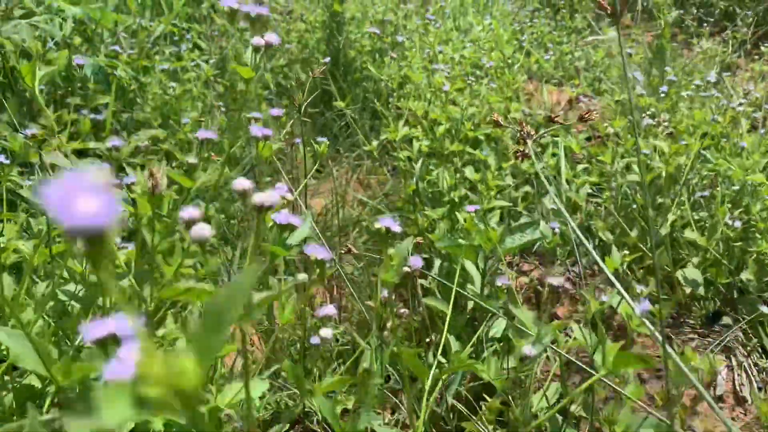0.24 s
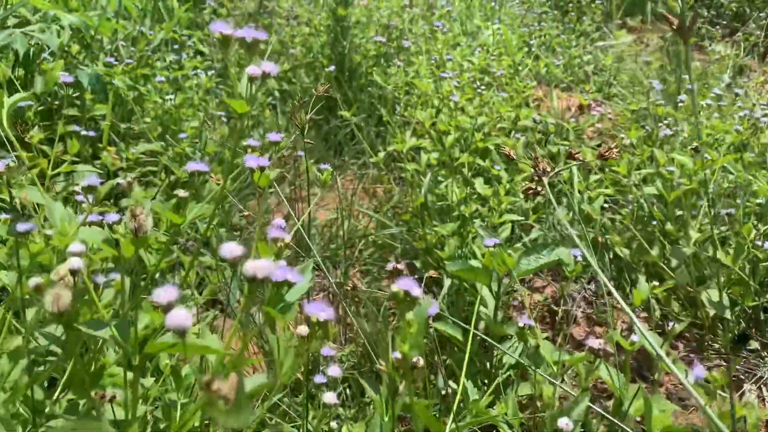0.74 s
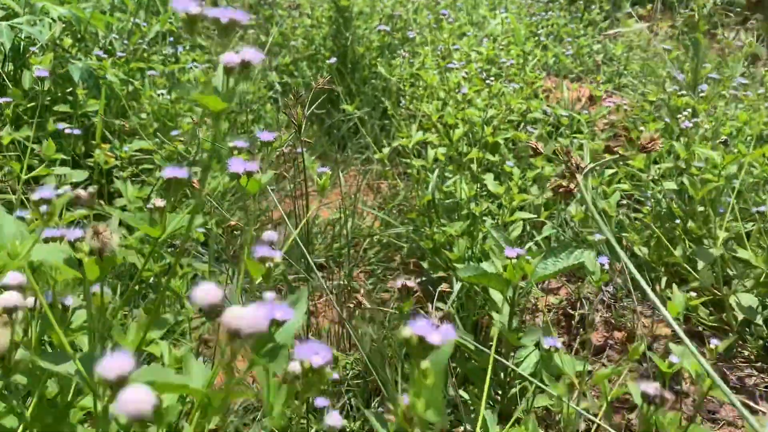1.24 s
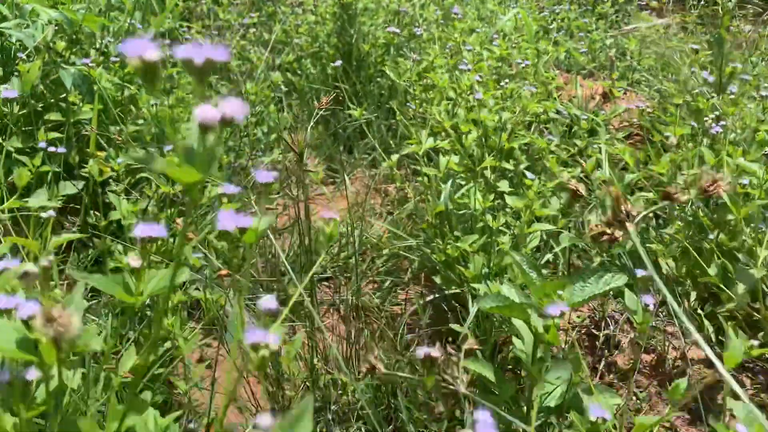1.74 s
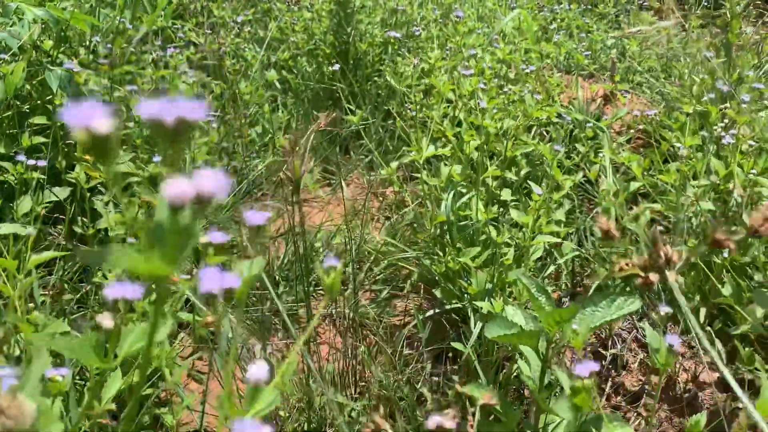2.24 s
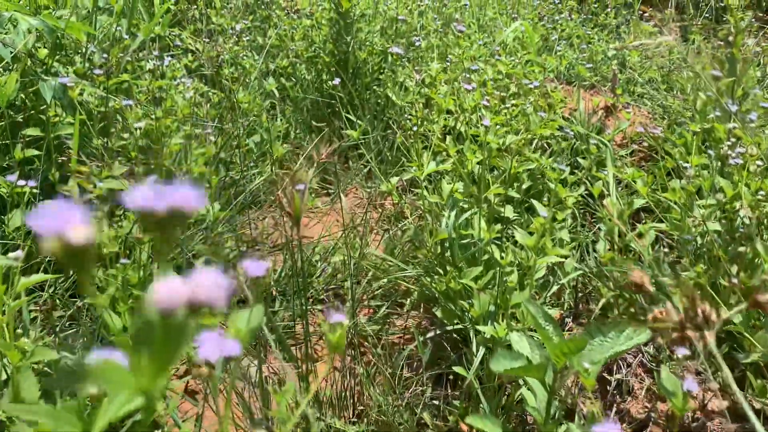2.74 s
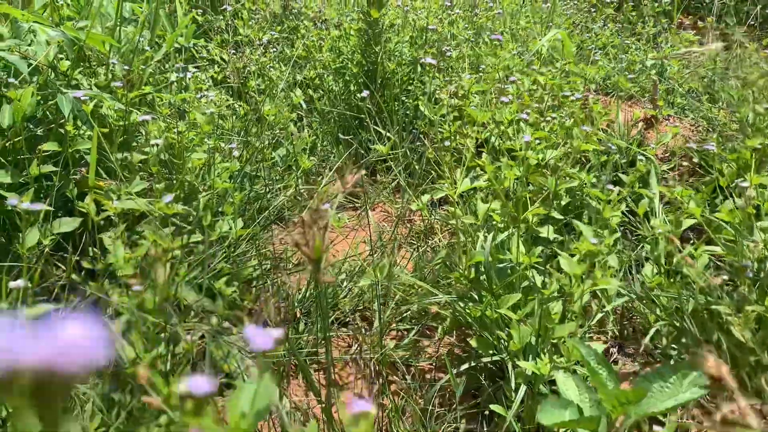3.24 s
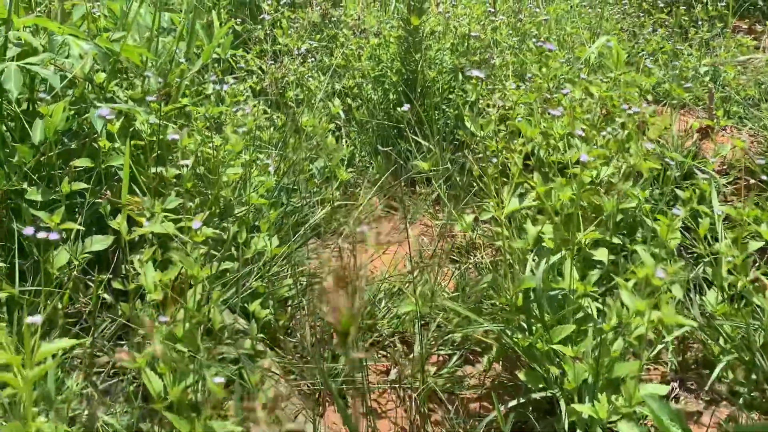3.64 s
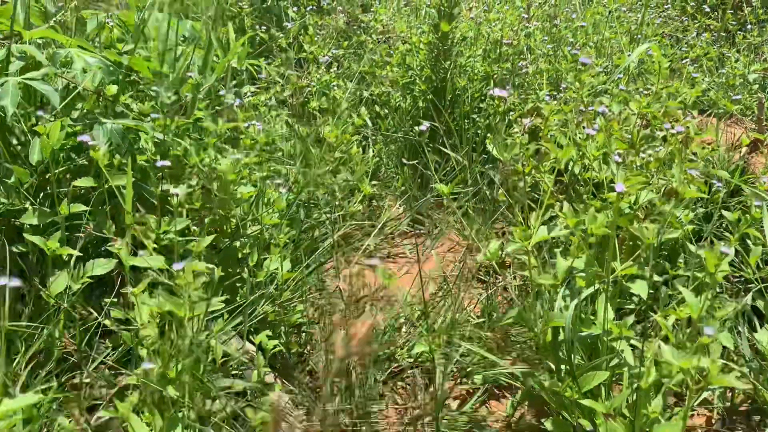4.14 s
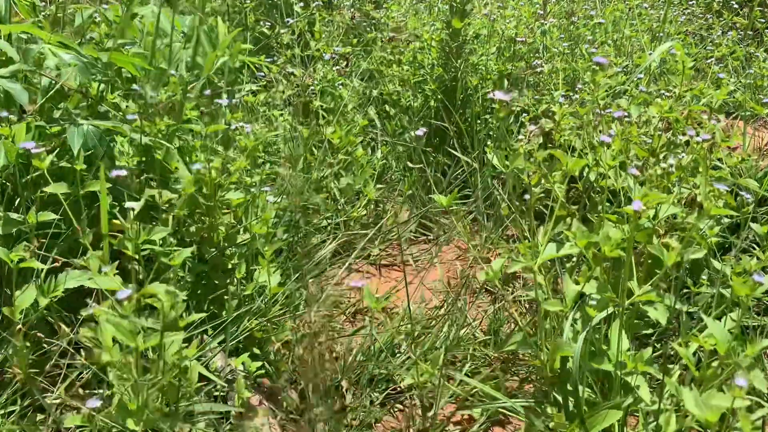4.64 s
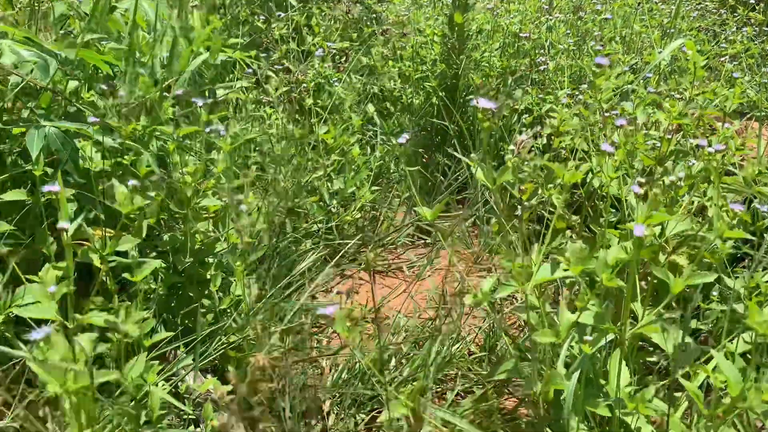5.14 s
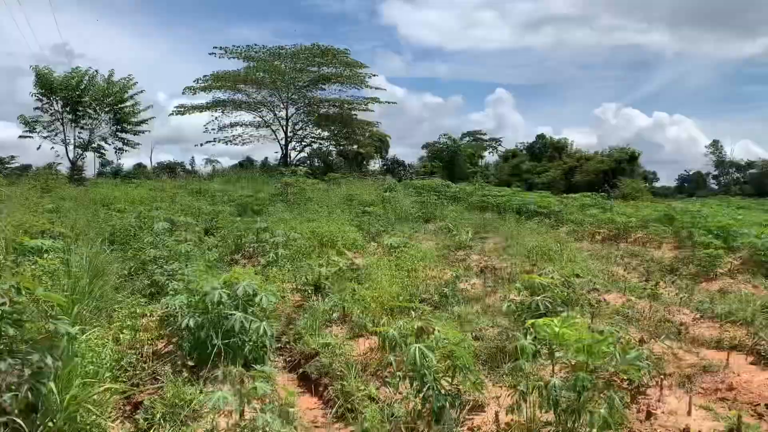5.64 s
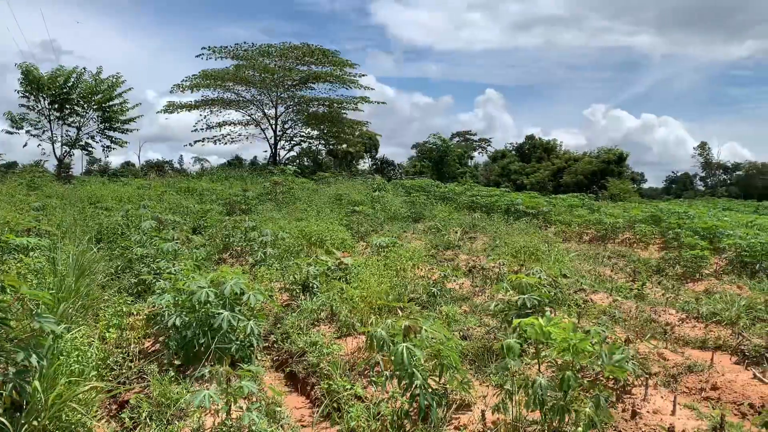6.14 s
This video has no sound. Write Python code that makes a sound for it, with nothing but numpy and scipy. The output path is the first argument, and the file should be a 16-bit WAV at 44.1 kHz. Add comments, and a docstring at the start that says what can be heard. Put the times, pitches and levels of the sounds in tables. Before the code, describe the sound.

A handheld stereo microphone moves through an overgrown field. It begins quietly, with faint brushing, a few stem ticks and soft low wind thumps. A small bird gives rough gliding chirps, then the weeds grow loud, swishing and snapping sharply close by. The rustling eases into scattered crackles and more chirps. Finally the sound cuts to an open place, where strong wind thuds on the microphone over faint distant insect hiss.

```python
"""An overgrown field, then an open spot, heard by a small stereo microphone that someone carries along.
Weeds brush past as noise and ticks in five colours; snapping stems are short cracks with bright rings.
Wind rumbles and thumps on the two ports; a small bird chirps in gliding rough whistles, among hollow pips.
Near the end the sound cuts to the open spot, where the walker stands still and insects hiss far off."""
import sys
import numpy as np
from scipy import signal
from scipy.fft import rfft, irfft, next_fast_len
from scipy.io import wavfile
from scipy.ndimage import uniform_filter1d

SR = 44100
rng = np.random.default_rng(int(sys.argv[2]) if len(sys.argv) > 2 else 0)


def transcribe(signal):
    """Save signal, clipped to [-1, 1], as a 16-bit WAV file at the path in sys.argv[1]."""
    frames = np.atleast_2d(signal).T
    limited = np.clip(frames, -1, 1)
    pcm = np.round(limited * 32767).astype(np.int16)
    wavfile.write(sys.argv[1], SR, pcm)


N = 281799
TIME = np.arange(N) / SR
# how much later a near sound reaches the left port: (time [s], delay [samples])
LEFT_LAG = [(0, 2), (2.2, 0), (2.5, 5), (4.1, 4), (4.7, 2.5), (5.2, -1.5), (5.3, -4)]


def gain_of(db):
    """Turns decibels into an amplitude factor."""
    return 10 ** (np.asarray(db) / 20)


def evened(x):
    """Scales to rms 1."""
    return x / np.sqrt(np.mean(x ** 2) + 1e-20)


def slow_noise(count, size, passes=1):
    """Random wander of rms 1: noise averaged over size steps, once or more."""
    wander = rng.standard_normal(count)
    for _ in range(passes):
        wander = uniform_filter1d(wander, size=size)
    return evened(wander)


def read(points, hz):
    """Reads a spectrum on a log-frequency axis."""
    f, value = np.transpose(points)
    return np.interp(np.log(hz + 1), np.log(f + 1), value)


def curves(rows):
    """Joins the columns of a table by straight lines in time."""
    s, *columns = np.transpose(rows)
    return [np.interp(TIME, s, c) for c in columns]


def panned(sound, pan_db):
    """Shares a sound between the ports, left pan_db louder than right."""
    return np.array([sound * gain_of(pan_db / 2), sound * gain_of(-pan_db / 2)])


def add(mix, s, sound):
    """Mixes rows of sound or power in at s seconds."""
    part = mix[:, round(s * SR):][:, :sound.shape[1]]
    part += sound[:, :part.shape[1]]


def swell(s, length_s, rise, top):
    """Returns start time and rows of power that rise to top at s and fall smoothly."""
    u = np.linspace(0, 1, round(length_s * SR))
    shape = np.sin(np.pi * np.interp(u, [0, rise, 1], [0, .5, 1])) ** 4
    return s - rise * length_s, top[:, None] * shape


def coloured(x, spectrum):
    """Gives both channels a spectrum, then rms 1."""
    size = next_fast_len(N + 4096)
    shape = gain_of(read(spectrum, np.fft.rfftfreq(size, 1 / SR)))
    return evened(irfft(rfft(x, size) * shape, size)[:, :N])


def wavelet(hz, turns, sweep):
    """A few cycles that swell quickly and die away, pitch falling from about (1 + sweep) hz to hz; peak 1."""
    u = np.arange(0, 4 * turns / hz, 1 / SR) * hz / turns
    cycles = turns * (u + sweep * (1 - np.exp(-2.5 * u)) / 2.67)
    envelope = u ** 2 * np.exp(-u * 3.32) * np.cos(np.pi * u / 8)  # the cosine closes the end
    shape = envelope * np.sin(2 * np.pi * cycles)
    return shape / abs(shape).max()


def lagged(left):
    """Delays the left port as the near sounds move around the microphone."""
    lag = np.round(curves(LEFT_LAG)[0]).astype(int)
    return left[np.clip(np.arange(N) - lag, 0, N - 1)]


def scattered(sound, t60, wet_db):
    """Leaves and ground throw back a short blur, different at each port."""
    taps = rng.standard_normal((2, 3000)) * gain_of(-60 * np.arange(3000) / SR / t60)
    blur = signal.oaconvolve(sound, taps / np.linalg.norm(taps[0]), axes=1)[:, :N]
    return sound + gain_of(wet_db) * blur


def hiss(same, patchy_db, flicker_db, size=512, near=False):
    """White stereo noise with random patches and a flicker shared by all pitches."""
    # the two ports face different ways: (frequency [Hz], lead of the left [rad])
    lead = [(4300, 0.5), (5500, -2), (6890, -6), (8270, -8), (9650, -11.5), (11000, -14.5), (13100, -18),
            (14500, -21)]
    frames, hz = 4 * N // size + 5, np.fft.rfftfreq(size, 1 / SR)
    a, b, c, d, patches = rng.standard_normal((frames, len(hz), 5)).T
    patches = uniform_filter1d(patches, size=4, axis=0)  # over pitch
    patches = evened(uniform_filter1d(patches, size=12, axis=1))  # over time
    flicker = slow_noise(frames, size=4)
    same = np.clip(read(same, hz), 0, 1)[:, None]
    left, other = a + 1j * b, c + 1j * d
    frame_s = (np.arange(frames) - 2) * size / 4 / SR
    lag = near * np.interp(frame_s, *np.transpose(LEFT_LAG))
    low = np.clip((5500 - hz) / 1200, 0, 1)  # the delay holds below the treble
    phase = 2 * np.pi / SR * np.outer(low * hz, lag) - read(lead, hz)[:, None]
    z = np.array([left, same * left * np.exp(1j * phase) + np.sqrt(1 - same ** 2) * other])
    z *= gain_of(patchy_db * patches + flicker_db * flicker)
    return evened(signal.istft(z, nperseg=size, noverlap=3 * size // 4)[1][:, :N])


def air_noise():
    """Distant noise, much alike at both ports in the bass and upper treble, separate between."""
    # left-right likeness of far sound: (frequency [Hz], likeness [0-1])
    far = [(100, 0.81), (1000, 0.037), (6500, 0.047), (10000, 0.77), (13100, 0.93), (14500, 0.27)]
    return hiss(far, patchy_db=2.5, flicker_db=0.0)


def field_air(air):
    """The steady background of the field: the air noise through a fixed spectrum."""
    # background of the field: (frequency [Hz], relative level [dB])
    colour = [(150, -5), (250, 1.5), (460, -0.5), (950, -10.5), (2330, 1), (3200, -9.5), (4500, -6),
              (6500, -15), (8700, -13.5), (10600, -18), (13300, -44), (14400, -12), (14700, -72)]
    return gain_of(-75.5) * coloured(air, colour)


def open_air(air):
    """The steady background of the open spot: the same air noise through another spectrum."""
    # background of the open spot: (frequency [Hz], relative level [dB])
    colour = [(300, -31), (500, -5), (950, -11), (1300, -5.5), (2400, -9.5), (3100, -11.5), (4200, -18.5),
              (4900, -15), (8700, -25), (10500, -24), (13300, -25.5), (14400, -28), (14700, -64)]
    return gain_of(-70) * coloured(air, colour)


def insects(air):
    """Far insects: a narrow band of the air noise, pulsing unevenly."""
    # band of the insects: (frequency [Hz], relative level [dB])
    band = [(3500, -41), (3950, -8), (4450, -8), (4900, -41)]
    # their loudness: (time [s], level [dB])
    levels = [(5.64, -77), (5.9, -80), (6.0, -84), (6.05, -77), (6.19, -78), (6.23, -95), (6.32, -92),
              (6.36, -80)]
    throb = gain_of(1.7 * slow_noise(N, size=400))
    return gain_of(curves(levels)[0]) * coloured(throb * air, band)


def ports(spectrum, same):
    """Air pressure at the two ports, partly shared."""
    shared, left, right = rng.standard_normal((3, N))
    separate = np.array([left, right])
    return coloured(np.sqrt(same) * shared + np.sqrt(1 - same) * separate, spectrum)


def wind():
    """Lumpy rumble, partly separate at each port, swelling in gusts, and single thumps."""
    # wind on the ports, before the trims: (time [s], rumble level [dB], upper rumble level [dB])
    wind_levels = [(0, -46.5, -66.5), (.5, -57, -63.5), (.62, -59.5, -71), (1.03, -61, -68.5),
                   (1.3, -57, -67), (1.7, -61, -65), (2, -55.5, -61), (2.45, -59.5, -59.5),
                   (2.62, -44, -42.5), (2.85, -48.5, -61), (3.05, -57, -61.5), (3.74, -65, -63.5),
                   (4.25, -56.5, -69), (5.14, -57, -60), (5.5, -52.5, -60.5), (5.62, -65, -68),
                   (5.7, -53, -54.5), (5.95, -38, -49.5), (6.12, -36.5, -44), (6.39, -48, -55)]
    # gusts that swell and pass, before the trims:
    # (top time [s], length [s], rumble level [dB], upper rumble over it [dB], left minus right [dB])
    gusts = [(0.09, 0.079, -61, -24, 8), (0.228, 0.047, -46.5, -14, -6), (0.44, 0.16, -43.5, -20, 0),
             (1.162, 0.063, -59, -31, -1), (1.648, 0.072, -49, -25, 0), (1.8, 0.12, -56, -3.5, -7),
             (1.938, 0.15, -42, -30, 0), (2.062, 0.12, -45.5, -8, -2.5), (2.215, 0.3, -44.5, -20, 2),
             (2.321, 0.15, -44, -2, -8), (2.535, 0.17, -47, -21, 4), (2.784, 0.062, -36.5, -23, 1),
             (3.105, 0.058, -51, -12, -2), (4.304, 0.29, -58, -33, -12), (4.493, 0.063, -45, -18, 0),
             (4.612, 0.077, -38, -16, 0), (4.708, 0.13, -46, -37, 4), (5.004, 0.11, -49.5, -21, 1),
             (5.254, 0.2, -38.5, -34, -2.5), (5.671, 0.085, -44, -5, -2.5), (5.778, 0.022, -42.5, -21, 11),
             (5.89, 0.1, -39, -14, 6), (5.992, 0.16, -45, -32, -6), (6.134, 0.07, -35, 2, 5),
             (6.234, 0.16, -30.5, -6, 1), (6.385, 0.14, -38, -15, 5.5)]
    # two spectra of wind pressure: (frequency [Hz], relative level [dB])
    rumble_colour = [(15, -48), (25, -30), (40, 2), (60, 5.5), (85, 2.5), (115, -15), (170, -30),
                     (260, -48), (600, -120)]
    upper_colour = [(40, -71), (70, -18), (110, 5), (200, -3), (350, -18.5), (550, -40), (1000, -110)]
    # single eddies that thump the membrane:
    # (time [s], peak level [dB], pitch [Hz], left minus right [dB])
    thumps = [(0.02, -44.5, 59.5, -1), (0.211, -41.5, 59.6, 4), (0.391, -41.5, 62, 0),
              (0.423, -41.5, 59, 1), (0.468, -45, 64, 0), (1.116, -45, 62.3, -1), (1.15, -51, 65.3, -2),
              (1.751, -45.5, 54.3, 1), (1.915, -45.5, 73.5, 2), (2.015, -43.5, 56.5, -13),
              (2.13, -42, 53, -15), (2.299, -49.5, 73.6, 18), (2.506, -50.5, 70.5, -17),
              (2.71, -42, 91.5, -4.5), (2.757, -36, 58.5, 0), (3.063, -51.5, 80.5, 0), (3.412, -51, 52, 4),
              (4.321, -49, 52.6, 4), (4.485, -55, 54.6, 6), (4.586, -69, 79, 0), (4.676, -49, 58.7, 2),
              (5.206, -41, 58.5, 7), (5.223, -35.5, 77.5, 1), (5.809, -36.5, 101, -1),
              (5.865, -41.5, 150, -3), (5.865, -32.5, 81.6, 0), (5.929, -35.5, 77.4, 1), (6.08, -38, 59, 6),
              (6.086, -40.5, 170, 2), (6.14, -30, 185, 0), (6.147, -22.5, 84, -4), (6.173, -36.5, 204, 2),
              (6.229, -38.5, 172, -2), (6.232, -27, 82, 1), (6.367, -39, 74.7, -4)]

    rumble, upper = np.repeat(gain_of(curves(wind_levels))[:, None] ** 2, 2, axis=1)  # power per port
    for s, length_s, db, over_db, pan in gusts:
        start, gust = swell(s, length_s, 0.53, panned(gain_of(db), pan) ** 2)
        add(rumble, start, gust)
        add(upper, start, gust * gain_of(over_db) ** 2)
    lumps = gain_of(5.75 * slow_noise(N, size=700, passes=2))
    out = gain_of(-3.5) * np.sqrt(rumble) * ports(rumble_colour, same=0.68)
    out += gain_of(-6.5) * np.sqrt(upper) * evened(ports(upper_colour, same=0.94) * lumps)

    for (s, db, hz, pan), lag in zip(thumps, rng.integers(-60, 60, len(thumps))):
        sweep = np.clip(0.068 * (db + 51.5), 0, 4)  # a harder eddy starts higher
        left, right = panned(gain_of(db) * wavelet(hz, turns=1.41, sweep=sweep), pan)
        lag_s = lag * (70 / max(hz, 70)) ** 2 / SR  # the eddy passes one port before the other
        add(out[:1], max(s + lag_s, 0), left[None])
        add(out[1:], s, right[None])
    return out


def pips():
    """Brief rounded hollow tones, slightly unsteady, with a faint blur."""
    # short pips: (time [s], level [dB], pitch [Hz], length [s])
    pip_rows = [(1.754, -67, 578, 0.033), (3.853, -65.5, 568, 0.053), (4.08, -63.5, 558, 0.037),
                (5.595, -55.5, 584, 0.033), (5.655, -61, 2130, 0.016), (5.66, -62.5, 2620, 0.019),
                (5.695, -57, 2134, 0.019), (5.734, -64.5, 4050, 0.025), (5.793, -69, 4000, 0.015),
                (5.832, -65, 1260, 0.014), (6.171, -71, 4050, 0.012)]
    out = np.zeros((2, N))
    for s, db, hz, length_s in pip_rows:
        t = np.arange(0, length_s, 1 / SR)
        waver = 1 + 0.46 * slow_noise(len(t), size=60, passes=2)
        tone = waver * np.hanning(len(t)) * np.sin(2 * np.pi * hz * t)
        add(out, s, panned(gain_of(db) * tone, 0))
    return scattered(out, t60=0.05, wet_db=-9.0)


def bird():
    """A gliding whistle roughened by fast random throbs; rising notes also beat quickly."""
    # bird notes: (start time [s], length [s], level [dB], first pitch [Hz], last pitch before any droop [Hz],
    # clearness: steady tone over throb [ratio], bend of the glide [exponent])
    chirps = [(0.018, 0.085, -78.5, 4100, 2470, 2.7, .75), (0.099, 0.16, -81, 2396, 2010, 3, 1.1),
              (0.392, 0.05, -82, 3050, 2600, 3, 1.1), (1.798, 0.038, -62, 4700, 5860, .6, 1.3),
              (1.813, 0.046, -55.5, 5870, 6250, 1.5, 3.5), (1.878, 0.021, -53.5, 6400, 4600, 2.2, 1.7),
              (2.005, 0.045, -59.5, 5920, 5800, 1.5, 1.3), (2.018, 0.011, -57, 5440, 5330, 1.3, 1.5),
              (2.235, 0.032, -56, 5060, 5760, 1.1, 1.15), (2.253, 0.048, -52, 5610, 6230, 1.6, 1.7),
              (2.324, 0.02, -54.5, 6300, 5000, 2.2, 0.89), (4.916, 0.052, -54, 4900, 6050, 0.56, 3.2),
              (4.989, 0.022, -53, 6250, 5000, 2, 1.1), (5.098, 0.033, -57, 5470, 5910, 2.6, 6.5),
              (5.129, 0.031, -64, 5480, 6080, 0.53, 4.4), (5.133, .024, -64, 6600, 7700, .3, 2.2)]
    # level along a note: (place of the peak [share of note], start [dB], end [dB])
    rising, falling = (0.42, -8.5, -3), (0.33, -1, -9.5)
    flutter_hz, flutter_depth, droop_hz = 190, .5, 420
    out = np.zeros((2, N))
    for s, length_s, db, first_hz, last_hz, clear, bend in chirps:
        u, rises = np.linspace(0, 1, round(length_s * SR)), last_hz > first_hz
        glide = 1 - (1 - u) ** bend if rises else u ** bend
        hz = first_hz + (last_hz - first_hz) * glide
        hz = hz - rises * droop_hz * u ** 4  # a rise sags at its end

        peak, start_db, end_db = rising if rises else falling
        breaks_db = 1.0 * slow_noise(len(u), size=250, passes=2)  # every note breaks up
        level_db = db + breaks_db + np.interp(u, [0, peak, 1], [start_db, 0, end_db])

        beating = 1 + rises * flutter_depth * np.cos(2 * np.pi * flutter_hz * length_s * u)
        throb = slow_noise(len(u), size=58, passes=2) + 1j * slow_noise(len(u), size=58, passes=2)
        carrier = np.exp(2j * np.pi * np.cumsum(hz) / SR)
        whistle = evened(((clear * beating + throb) * carrier).real)
        note = gain_of(level_db) * whistle * signal.windows.tukey(len(u), .15)
        add(out, s, panned(note, -3.5))
    later_left = np.roll(out[0], 2)
    return scattered(np.array([later_left, out[1]]), t60=0.15, wet_db=-9.0)


def snaps():
    """Each stem gives a short crack with a weak bounce off the ground, and a bright ring blurred by leaves."""
    # snapping stems, before the trims: (time [s], crack level [dB], crack pitch [Hz], ring level [dB],
    # ring pitch [Hz], left minus right [dB])
    stems = [(0.1104, -56, 1760, -75, 6200.0, 9), (0.3, -58, 1770, -57.5, 6300, 5),
             (0.33, -50.5, 1970, -54, 4420, -5), (0.368, -50, 2280, -64, 4500, 0),
             (0.408, -55, 2200, -42.5, 5900, 3), (0.437, -58, 556, -71, 6300.0, 0),
             (0.792, -59.5, 2270, -78, 4300, -6), (0.8986, -67, 4100, -58, 4520, 4),
             (1.152, -56, 2420, -70, 4700, -1), (1.2414, -62, 3400, -67, 4700, 5),
             (1.2632, -55.5, 1820, -59, 4900.0, 5), (1.3167, -55, 3400, -52, 5300, -3),
             (1.3263, -55, 1710, -44.5, 10500, 6), (1.3413, -55.5, 2600, -50, 12400, 15),
             (1.5538, -62, 3100, -57, 4300, 3), (1.6089, -73, 1100, -42, 12700, 3),
             (2.221, -43, 2650, -46, 5200, -1), (2.519, -37.5, 3710.0, -60, 4800.0, 4),
             (2.6833, -43, 1030, -42, 10000.0, -4), (2.6918, -48, 2800, -39, 4970, 3),
             (2.7069, -43, 2120, -35, 12200, -5), (2.779, -42.5, 3160, -56, 9200.0, 12),
             (2.7888, -44, 2700, -43, 5100, 3), (2.878, -38, 2440, -62, 6000, 2),
             (2.916, -44, 2350.0, -35, 11800, 2), (2.944, -35, 1750, -36, 5900, -1),
             (2.975, -64, 2340.0, -34.5, 9000, -14), (3.025, -38.5, 2010, -40, 4200, -5),
             (3.036, -31.5, 2450, -35.5, 5200, 0), (3.0689, -32, 2430, -58, 5300.0, -3),
             (3.085, -40, 1800, -60, 5000, -2), (3.103, -48, 2560.0, -35, 9600, -4),
             (3.164, -48, 3500, -36, 5200, 4), (3.1926, -39, 4050, -35.5, 9100, -1),
             (3.2693, -43, 2280, -57, 5900.0, 3), (3.313, -49, 2700, -47, 4700, 2),
             (3.336, -47, 2560, -56, 4300, 5), (3.417, -45, 2930.0, -63, 12500.0, 6),
             (3.4386, -38.5, 3650, -35.5, 12400, 2), (3.4566, -45, 2600, -61, 4700, 2),
             (3.5274, -36.5, 2380, -38, 7700, 4), (3.566, -43.5, 1700.0, -59, 8000.0, -3),
             (3.6113, -49.5, 1640, -69, 6400.0, 0), (3.641, -51, 1750, -76, 6300.0, 4),
             (3.734, -58, 2070.0, -49, 6160, 4), (3.8348, -49.5, 1820, -74, 7600.0, 4),
             (3.8917, -43, 1210, -42, 3860, -4), (3.9735, -52, 2230, -40.5, 9900, 3),
             (3.997, -54, 2170, -42.5, 9800, 5), (4.373, -51.5, 1700, -65, 6300.0, 1),
             (4.572, -52, 2950.0, -62, 6100.0, 7.0), (4.5888, -52, 2640, -47.5, 6130, 20),
             (4.7136, -55, 2800, -53, 7300, 5), (4.7813, -40.5, 1490, -38, 3180, 3),
             (4.802, -55, 3200, -54, 7300.0, 9), (4.8337, -53, 1440, -70.0, 7400.0, 6),
             (4.937, -46, 1600, -50, 3570, 3), (5.037, -55, 2920.0, -64, 5100.0, 5.0),
             (5.052, -57, 3250, -62, 6340, 6), (5.1, -58, 1430, -62, 5600.0, 1),
             (5.212, -67, 1200, -53, 5700, 3), (5.265, -50, 2830, -47, 6600, -1),
             (5.6142, -52, 4000, -37, 6000, 2.5), (5.6319, -43, 1530, -54, 4430, -2)]
    cracks, rings = np.zeros((2, 2, N))
    for s, db, hz, ring_db, ring_hz, pan in stems:
        for delay_s, loss_db in (0, -2), (.0011, -12.5):  # direct, then the bounce
            crack = gain_of(db + loss_db) * wavelet(hz, turns=1.24, sweep=0.3)
            add(cracks, s + delay_s, panned(crack, pan))
        ring = gain_of(ring_db) * wavelet(ring_hz, turns=2.9, sweep=0.13)
        first_tick = gain_of(ring_db - 4.5) * wavelet(ring_hz, turns=.7, sweep=.5)  # wide in pitch
        add(rings, s, panned(ring, pan))
        add(rings, s, panned(first_tick, pan))
    out = scattered(cracks, t60=0.024, wet_db=1.0)
    out += gain_of(-7.0) * scattered(rings, t60=0.012, wet_db=1.5)
    return np.array([lagged(out[0]), out[1]])


def crackle(per_s, spread_db, count=30):
    """Tiny ticks of leaves and stems at many pitches; each pitch reaches the ports with its own delay."""
    clumps = gain_of(6.0 * slow_noise(N, size=800))  # ticks come in bunches
    happens = rng.random(N) < clumps * per_s / SR
    strength = gain_of(spread_db * np.minimum(rng.exponential(1, N), 5)) * happens
    kind, out = rng.integers(0, count, N), np.zeros((2, N))
    for k, hz in enumerate(np.geomspace(700, 12000, count)):
        tick = wavelet(hz, turns=2.27, sweep=0.36)
        tick = tick / np.linalg.norm(tick) * np.sqrt(hz)  # equal energy per hertz
        train = signal.oaconvolve(strength * (kind == k), tick)[:N]
        out += [np.roll(lagged(train), rng.integers(-2, 3)), train]
    return evened(out)


def walk():
    """Legs push through weeds: one brushing of smooth swish and ticks, in five colours that come and go."""
    # legs in the weeds, before the trims:
    # (time [s], rustle level [dB], leaf fizz over it [dB], tread of the sole over it [dB])
    steps = [(0, -78, -8, -4.5), (.48, -78, -9, -13), (.63, -79.5, -7, -15.5), (1.15, -81, -4, 2),
             (1.73, -78, -5.5, -12), (1.78, -71, -14, 0.5), (1.9, -65, -18.5, -12), (2.15, -67, -12, -4.5),
             (2.3, -61.5, -9, -6.5), (2.52, -55.5, -8, -11), (2.85, -56.5, -4, -16),
             (3.07, -53.5, -8.5, -19), (3.22, -61, -6.5, -10), (3.5, -64, -11.5, -12.5),
             (3.7, -69, -10, -4), (4.05, -68, -14, -12), (4.2, -75, -7.5, -7), (4.7, -69.5, -15, -15),
             (5.16, -74, -11.5, -6), (5.36, -64.5, -17, -15), (5.64, -61, -12.5, -10.5)]
    # single plants brushing past, before the trims: (top time [s], length [s], rustle level [dB],
    # then over it: swish of blades [dB], fizz [dB], tread [dB], coarse rub of stalks [dB])
    brushes = [(0.348, 0.091, -64.5, -16, -16, -18, 0), (0.405, 0.22, -71, -11, -14, -13, -11),
               (0.947, 0.32, -72, -26, -25, -26, -15), (1.257, 0.12, -69, -14, -15, -13, -15),
               (1.336, 0.22, -71, -5.5, -5, -1, -8), (1.599, 0.1, -74, -1, 5.5, -1, -16),
               (1.947, 0.15, -64.5, -5.5, -31, -6, 6.5), (2.072, 0.24, -71.5, 1.5, -9, -20, 2.5),
               (2.174, 0.078, -79, 9, 11, -3, 6), (2.332, 0.13, -61.5, -2.5, -6, -5, -5),
               (2.463, 0.045, -63.5, 1, 2, 3.5, -11), (2.79, 0.048, -52, -16, -6, -24, -15),
               (3.288, 0.18, -59, -11.5, -6.5, -20, -6.5), (3.433, 0.071, -57, -14, -4, -23, -5),
               (3.562, 0.16, -65.5, -17, -5, -22, -1), (3.737, 0.036, -72, 8, 2, -10, -1),
               (3.898, 0.11, -66.5, -29, -28, -7, -2), (4.006, 0.14, -70.5, -7, 3, -11, -8),
               (4.367, 0.29, -74.5, -6, -16, -7, -15), (4.577, 0.15, -70, 0, -12, -4.5, -26),
               (4.786, 0.068, -64, -6, -5, -3, -3.5), (4.96, 0.39, -67.5, -6, -22, -18, -6),
               (5.432, 0.64, -70.5, 2, -27, -5, 8), (5.478, 0.14, -73.5, -6, 1, 10, 11.5)]
    # left-right likeness of the brushing: (frequency [Hz], likeness [0-1])
    likeness = [(100, 1), (400, 0.68), (1400, 0.58), (2750, 0.4), (4100, 0.063), (6900, 0.059),
                (9650, 0.89), (13100, 1), (14500, .3)]
    # five colours of the brushing: (frequency [Hz], relative level [dB])
    rustle = [(600, -75), (1300, -23), (1750, -2.5), (2100, 1), (2320, 2), (2600, 3), (3050, 0),
              (4500, -0.5), (5500, -10), (9000, -60)]
    swish = [(2500, -64), (4600, -12.5), (6000, 3), (7300, -1.5), (8800, -3), (10000, -18), (14000, -62)]
    fizz = [(5000, -101), (8500, -8), (10000, -1.5), (11500, -1), (13300, 0.5), (14400, -4), (14700, -31)]
    tread = [(80, -56), (150, -4), (300, 8.5), (600, 2.5), (1000, -6), (2500, -44)]
    rub = [(300, -23.5), (850, -8), (1400, -2), (1800, -7.5), (4000, -77)]

    rustle_db, fizz_db, tread_db = curves(steps)
    over_rustle = (0, -10.5, fizz_db, tread_db, -7.5)  # rustle, swish, fizz, tread, rub [dB]
    power = gain_of([rustle_db + db for db in over_rustle]) ** 2
    for s, length_s, db, *over_db in brushes:
        top = gain_of(db + np.array([0, *over_db])) ** 2
        add(power, *swell(s, length_s, 0.42, top))

    ticks_db = -5 + .5 * (rustle_db - rustle_db.max())  # harder pushes tick more
    ticks = gain_of(ticks_db) * crackle(per_s=2200, spread_db=3.4)
    brushing = hiss(likeness, patchy_db=3.0, flicker_db=0.96, near=True) + ticks
    trims_db = (-1.0, 3.0, 0.45, 0.9, -1.7)
    layers = zip(power, (rustle, swish, fizz, tread, rub), trims_db)
    return sum(np.sqrt(p) * gain_of(db) * coloured(brushing, colour) for p, colour, db in layers)


def scene():
    """The walk through the field, then a cut with a short gap to the open spot; wind and pips in both."""
    cut_s, gap_s, fade_s = 5.635, .006, .003
    before = np.clip((cut_s - TIME) / fade_s + 1, 0, 1)
    after = np.clip((TIME - cut_s - gap_s) / fade_s, 0, 1)
    air = air_noise()
    walking = field_air(air) + bird() + snaps() + walk()
    standing = open_air(air) + insects(air)
    return before * walking + after * standing + (before + after) * (wind() + pips())


def record(dry):
    """The hardest gusts overload the microphone softly; then the band limit."""
    overload, edge_hz = .11, 15770  # the membrane gives way softly near this pressure
    heard = overload * np.tanh(dry / overload)
    heard = np.pad(heard, ((0, 0), (255, 255)), "edge")
    lowpass = signal.firwin(511, edge_hz, window=("kaiser", 9), fs=SR)
    return signal.oaconvolve(heard, lowpass[None], "valid")


dry = scene()
out = record(dry)
transcribe(out)
```